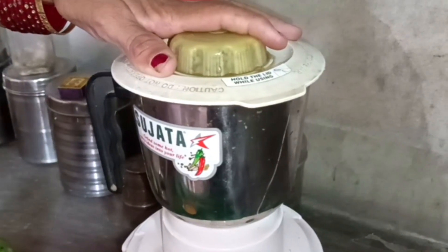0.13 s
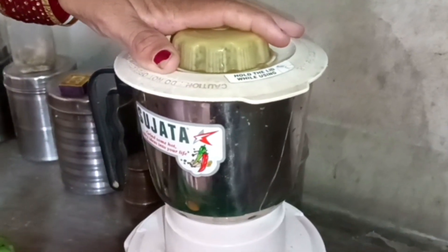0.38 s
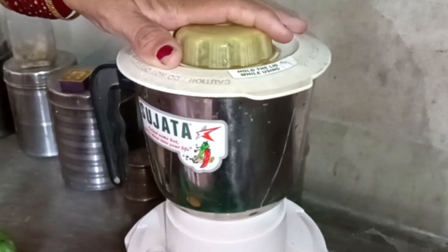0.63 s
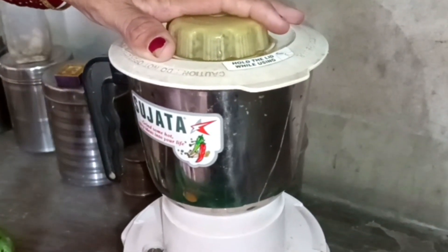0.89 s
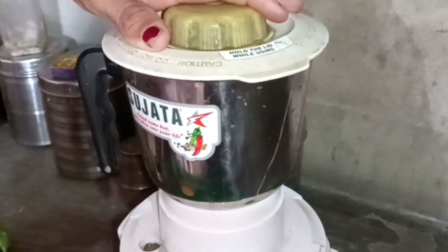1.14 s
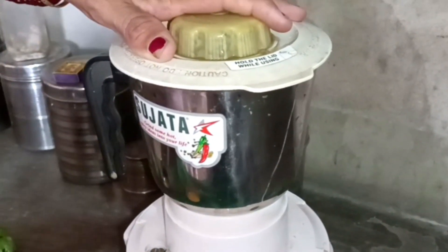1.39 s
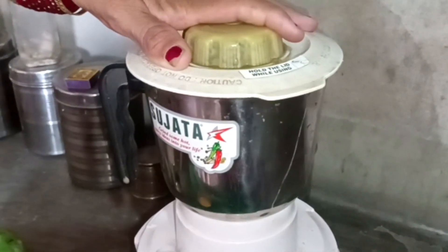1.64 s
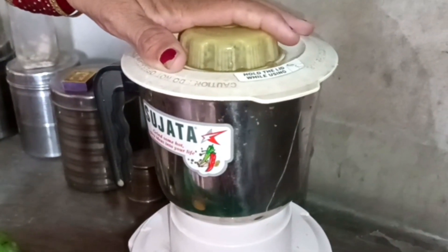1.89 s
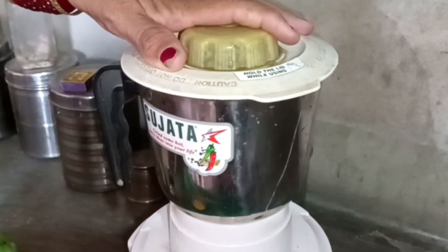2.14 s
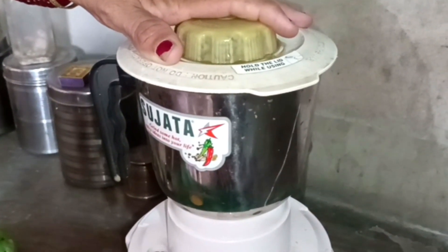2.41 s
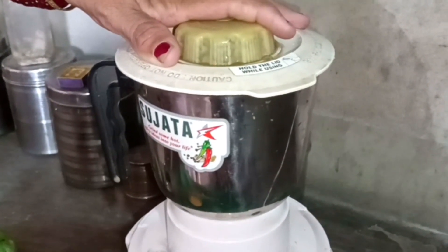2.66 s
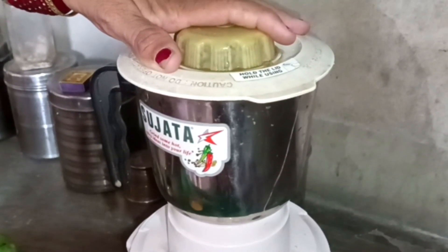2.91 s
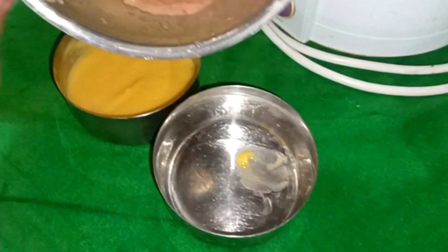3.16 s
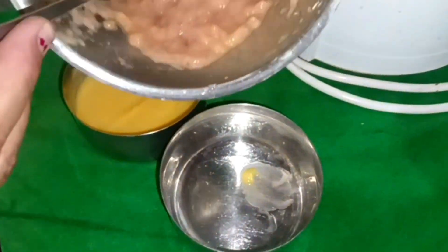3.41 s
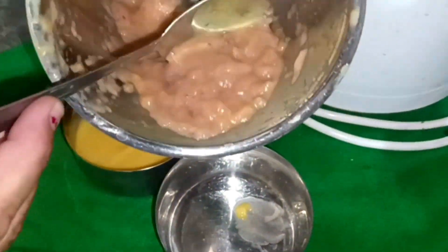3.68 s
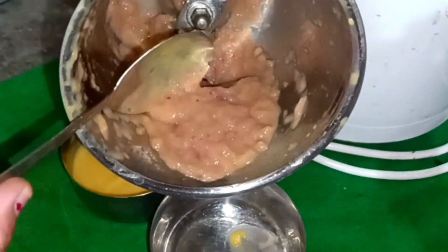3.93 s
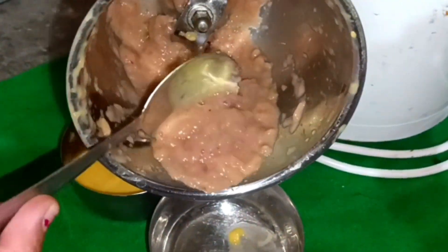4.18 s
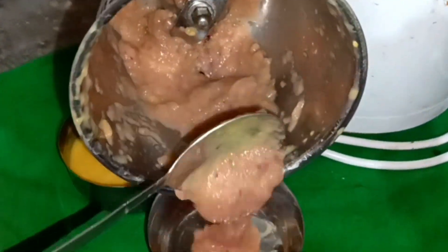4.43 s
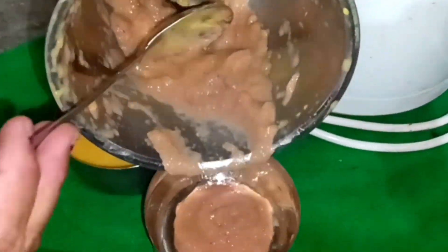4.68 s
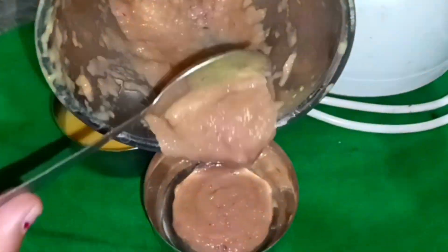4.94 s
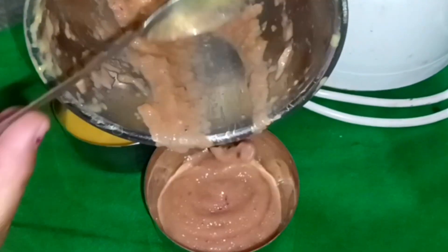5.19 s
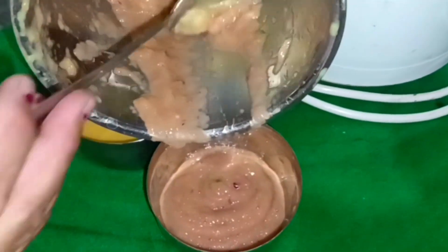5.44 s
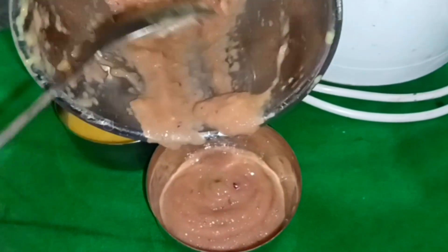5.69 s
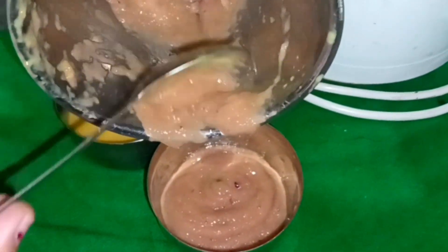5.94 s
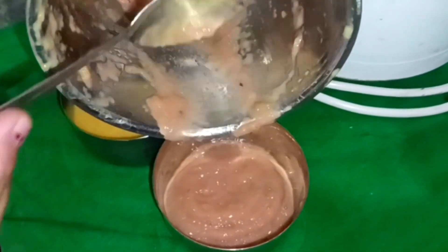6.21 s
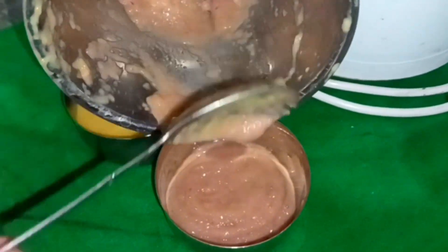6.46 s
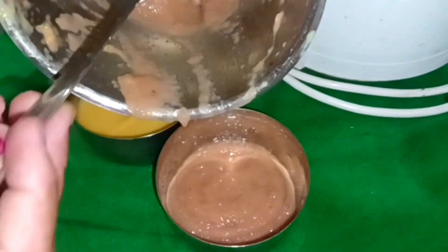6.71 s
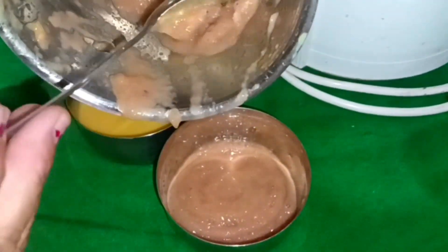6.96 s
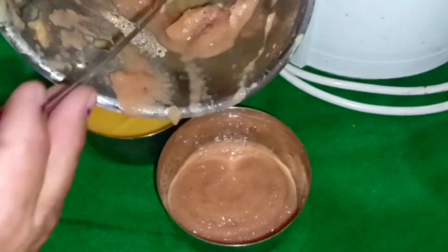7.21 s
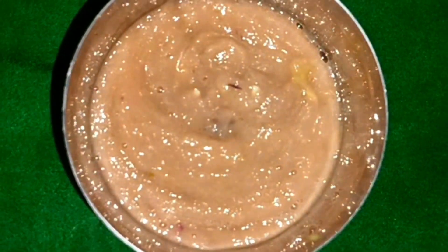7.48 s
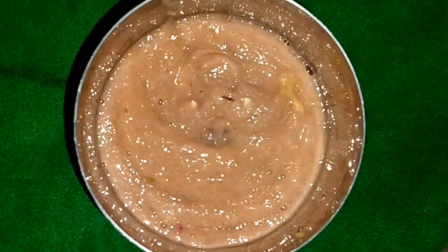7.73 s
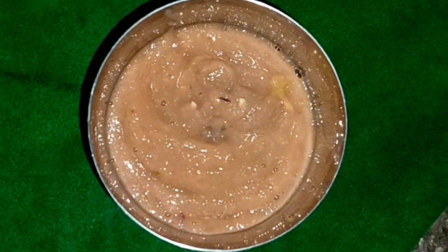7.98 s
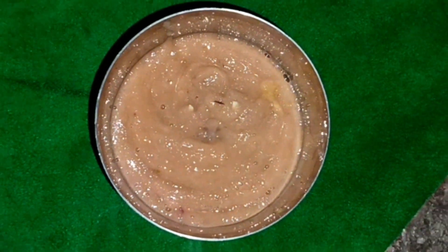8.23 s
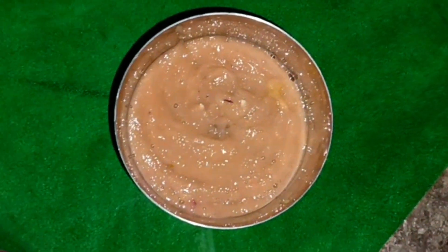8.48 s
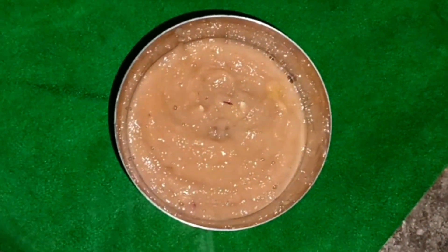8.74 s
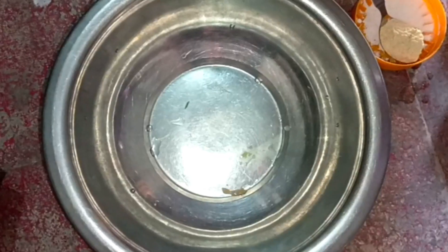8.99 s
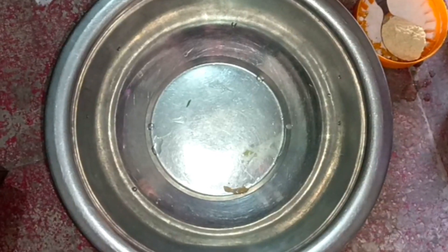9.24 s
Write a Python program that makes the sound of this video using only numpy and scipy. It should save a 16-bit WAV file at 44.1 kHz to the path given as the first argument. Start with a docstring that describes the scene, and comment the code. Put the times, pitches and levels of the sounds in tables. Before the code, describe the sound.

A grinder motor climbs in pitch for three seconds, lumpy and rattling at first, then smoother and whinier, and stops in a hard cut. Next, a ladle strikes and drags paste out of a steel jar, with choked ringing knocks, gritty scrapes and wrist bangles jingling. A second cut leaves clustered high bangle clinks, soft thumps and hand noise in a small reflective kitchen, captured close by phone; a brief muted gap comes near the end.

```python
"""A kitchen grinder speeds up as its load turns to paste: wavering motor tones ring a housing over
chopping and fan noise, until an edit cuts it off. Then, close to a phone, a ladle knocks and scrapes
the steel jar while bangles clink on the wrist: blows ring decaying modes, grit shakes them on.
A second edit cuts to the bowl. Low bumps, hand noise, tiled reflections and air lie behind.
A short stretch near the end is muted."""
import sys
import numpy as np
from scipy import signal
from scipy.fft import rfft, irfft, next_fast_len
from scipy.io import wavfile
from scipy.ndimage import uniform_filter1d, minimum_filter1d

SR = 44100
rng = np.random.default_rng(int(sys.argv[2]) if len(sys.argv) > 2 else 0)


def rack_gain(trim_db):
    """Turn a fader trim in dB into the linear factor to multiply a signal by."""
    fader = np.asarray(trim_db, float)
    return 10 ** (fader / 20)


def put_to_file(sound):
    """Save the sound as 16-bit audio at rate SR, in the file named by the first command-line argument."""
    columns = np.atleast_2d(sound).T  # one column per channel
    safe = np.clip(columns, -1, 1)
    whole_steps = np.round(safe * 32767)
    wavfile.write(sys.argv[1], SR, whole_steps.astype(np.int16))


N = 413211

HANDS_FROM_S, BOWL_FROM_S, HANDS_TO_S = 3.04, 7.28, 8.89  # an edit cuts to the bowl
JAR_DAMPING = .6  # share of the free ring time left while the jar is held
# Modes of the empty steel jar. Each row: pitch in Hz, relative level in dB, free t60 in seconds.
JAR_MODES = [(318, -26, .15), (722, -4, 0.17), (1165, -14, 0.25), (1326, -9, .3), (1563, -10, 0.039),
             (1725, -7, .2), (1805, 1, 0.18), (1927, -11, .3), (2060, -7, 0.3), (2480, -5, 0.25),
             (2570, -8, .25), (2756, -3, .15), (2860, -3.5, 0.16), (2923, -12, .12), (3080, -1, 0.07),
             (3883, -17, 0.13), (4100, -16, .15), (5200, -22, 0.2), (6100, -9.5, 0.032), (6710, -19, .03),
             (9130, -21.5, .04), (10950, -27, 0.051)]
# Modes of the bangles. Each row: pitch in Hz, relative level in dB, free t60 in seconds.
BANGLE_MODES = [(2090, 4, 0.09), (1950, -3, .07), (5330, -2, 0.13), (5800, -6, .15), (6000, 3, 0.2),
                (7860, -12, 0.061), (8570, -7, 0.12), (8500, -4, .1), (9420, 5, 0.05), (9560, 1, 0.34),
                (10470, -4, .2), (11390, 2, .2), (11100, -8, .2), (11520, -1, .15), (10900, -5, 0.3),
                (10200, -5, .2), (11600, -2.5, 0.3), (12550, -11, .16), (11770, -2, 0.21),
                (13100, -3, 0.23), (14700, -11.5, .12), (14600, -3.5, .1), (16200, -9.5, .1),
                (15300, -4.5, .12)]


def read(points, hz):
    """Reads a spectrum on a log-frequency axis."""
    f, value = np.transpose(points)
    return np.interp(np.log(hz + 1), np.log(f + 1), value)


def evened(x):
    """Scales to rms 1."""
    return x / np.sqrt(np.mean(x ** 2) + 1e-20)


def curves(rows):
    """Columns of a table, after the seconds, at every sample."""
    s, *columns = np.transpose(rows)
    return [np.interp(np.arange(N) / SR, s, c) for c in columns]


def swells(rows):
    """One envelope per row: a straight rise and a straight fall in dB, kept to its side of the bowl edit."""
    t = np.arange(N) / SR
    envelopes = []
    for s, db, rise_s, fade_s, *_ in rows:
        fall_db = 60 * np.maximum((s - t) / rise_s, (t - s) / fade_s)
        same_side = (t < BOWL_FROM_S) == (s < BOWL_FROM_S)
        envelopes.append(rack_gain(db - fall_db) * same_side)
    return np.array(envelopes)


def colour(x, points):
    """Gives x a spectrum, rms 1."""
    size = next_fast_len(N)
    gain = rack_gain(read(points, np.fft.rfftfreq(size, 1 / SR)))
    return evened(irfft(rfft(x, size) * gain, size)[:N])


def waver(hz, count=N):
    """Slow chance: normal random points, hz of them a second, joined by straight lines."""
    steps = rng.standard_normal(int(count / SR * hz) + 2)
    return np.interp(np.arange(count) / SR * hz, np.arange(len(steps)), steps)


def grit(per_s, spread_db, hiss):
    """Random clicks, a few large, over a share of hiss."""
    size = rack_gain(spread_db * np.minimum(rng.exponential(1, N), 4)) * rng.choice([-1, 1], N)
    return evened(size * (rng.random(N) < per_s / SR)) + hiss * rng.standard_normal(N)


def rattle(modes, per_s, spread_db, hiss):
    """Every mode is a two-pole resonator shaken by its own grit; rms 1."""
    out = np.zeros(N)
    for hz, db, t60 in modes:
        r = 10 ** (-3 / (t60 * SR))
        turn = 2 * np.pi * hz / SR
        shaken = grit(per_s, spread_db, hiss)
        out += rack_gain(db) * signal.lfilter([np.sin(turn)], [1, -2 * r * np.cos(turn), r * r], shaken)
    return evened(out)


def resonant_noise(hz, width):
    """Noise in one resonance, rms 1: a one-pole filter turned up to the pitch."""
    turn, r = np.exp(2j * np.pi * hz * np.arange(N) / SR), np.exp(-np.pi * width / SR)
    return evened((turn * signal.lfilter([1], [1, -r], rng.standard_normal(N) / turn)).real)


def add(mix, s, sound):
    """Mixes a sound in at s seconds; the bowl edit cuts what still rings."""
    end = round(BOWL_FROM_S * SR) if s < BOWL_FROM_S else N
    part = mix[round(s * SR):end][:len(sound)]
    part += sound[:len(part)]


def strike(mix, modes, s, db, hz, damping, tick_db, chatter_db, octaves, chatter_s, rise_s, grip_s,
           crack_db, shine, far_db):
    """A blow rings the modes near hz most; the parts chatter on and ring them again."""
    f, level, t60 = np.transpose(modes)[:, :, None]
    t = np.arange(SR // 3) / SR
    luck, noise = rng.standard_normal((2, len(f), 1)), rng.standard_normal((3, len(t)))
    spread_db, detune = 3.0 * luck[0], 1 + .008 * luck[1]
    level = level - np.minimum(6 * (np.log2(f / hz) / octaves) ** 2, far_db) + spread_db
    decay = rack_gain(level - 60 * t / (t60 * np.clip(damping, .05, 3)))
    ring = (decay * np.sin(2 * np.pi * f * detune * t)).sum(0)
    ring /= abs(ring).max()
    tick = signal.lfilter(*signal.butter(2, shine, "band", fs=SR), noise[0])
    contacts = noise[1] * rack_gain(6.0 * noise[2] - 60 * t / chatter_s)
    chatter = signal.fftconvolve(contacts, ring + 0.22 * tick * (t < .001))[:len(t)]
    chatter /= np.sqrt(np.mean(chatter[:SR // 30] ** 2))
    around = (0.95 * hz, min(1.093 * hz, 16000))
    crack = signal.lfilter(*signal.butter(2, around, "band", fs=SR), noise[2])
    crack *= rack_gain(crack_db - 60 * t / 0.027)
    left_ringing = .06
    blow = crack + ring * (rack_gain(-60 * t / grip_s) + left_ringing)  # paste and fingers choke the first ring
    sound = blow + rack_gain(tick_db - 60 * t / 0.012) * tick + 0.17 * rack_gain(chatter_db) * chatter
    add(mix, s, rack_gain(db) * sound * (1 - np.exp(-t / rise_s)))


def motor(speed, n, slot_db, bar_db, shaft_db):
    """Shaft, slot and commutator tones follow the speed and swell at the housing resonances."""
    # Shaft tones. Each row: multiple of the shaft speed, relative level in dB.
    shaft_lines = [(1, -7.5), (2, -4.5), (3, -12), (4, -14.5), (5, -4), (5.5, 0), (6, 1.5), (7, -1), (8, 0),
                   (9, -3), (10, -15), (10.5, -2), (11, 6), (13, 4), (13.5, -3), (14, 1), (14.5, -4),
                   (15, 0), (16, -3), (17, -3), (18, -3), (19, -2.5), (19.5, -4), (20.5, -6), (21.5, -9),
                   (22, -9), (26, -13), (28.5, -13), (29.5, -8), (30, -8.5), (31, -9), (31.5, -7), (32, -6),
                   (32.5, -5), (33, -6), (36, -4), (48, 1), (72, -6)]
    # The field's pull throbs at twice the mains. Each row: throb steps from the slot whine, relative dB.
    throb_lines = [(-2, -25), (-1, -4), (0, 0), (1, -3), (2, -13)]
    # Motor housing resonances. Each row: pitch in Hz, width in Hz, lift in dB added to the plain tone.
    housing_modes = [(142, 16, 19), (196, 26, 9), (335, 36, 19), (535, 40, 15), (1335, 60, 9),
                     (1930, 80, 19.5), (2145, 40, 6)]
    # Brief dips of the slot whine. Each row: middle in seconds, depth in dB.
    whine_dips = [(1.005, -6), (1.105, -6), (1.222, -9), (1.277, -6), (1.45, -9), (1.52, -7), (1.585, -11),
                  (1.702, -11), (1.755, -6), (1.83, -10), (1.96, -6), (2.2, -6)]
    throb_hz, slots, bars, dip_s = 99, 12, 24, .011
    bar_rough = .14  # turns of phase that lumps shake the commutator whine by, from a standing start
    fading_db = 1.4  # lines come and go
    buried_db_per_turn, smooth_speed = .45, 184  # below this speed lumps bury the middle lines
    turns, t = np.cumsum(speed)[:n] / SR, np.arange(n) / SR
    lumpy = np.clip((185 - speed[:n]) / 70, 0, 1)

    def tone(order, steps, db):
        """One wavering line, lifted where it crosses a housing resonance."""
        hz = order * speed[:n] + steps * throb_hz
        lift = 1 + sum(rack_gain(d) / (1 + (2 * (hz - f) / w) ** 2) for f, w, d in housing_modes)
        rough = .3 * (order / 48) ** 2  # sparking brushes roughen the high multiples
        rough = rough + (order % bars == 0) * order / bars * bar_rough * lumpy
        phase = order * turns + steps * throb_hz * t + rng.random() + rough * waver(250, count=n)
        level_db = db[:n] + 2.8 * waver(26, count=n) + fading_db * (waver(9, count=n) - .2)
        return np.sqrt(2) * lift * rack_gain(level_db) * np.cos(2 * np.pi * phase)

    buried_db = buried_db_per_turn * np.maximum(smooth_speed - speed, 0)
    shaft = sum(tone(k, 0, shaft_db + db - buried_db * (2.5 < k < 35)) for k, db in shaft_lines)
    seconds = np.arange(N) / SR
    dips_db = sum(db * np.exp(-((seconds - s) / dip_s) ** 2) for s, db in whine_dips)
    slot = sum(tone(slots, k, slot_db + dips_db + db) for k, db in throb_lines)
    return shaft + slot + tone(bars, 0, bar_db)


def chopping(chop_db):
    """Grit tumbles and shakes the loaded jar and base; hard pieces make it burst."""
    # Pieces tumbling. Each row: pitch in Hz, relative dB per Hz.
    tumble_spectrum = [(24, -66), (60, -34), (293, -17), (593, -23.5), (1060, -5.5), (1620, -15),
                       (2090, -1), (2370, -6.5), (5730, -22), (7010, -30), (11300, -22), (15300, -41),
                       (16500, -75.5)]
    # The loaded jar. Each row: pitch in Hz, width in Hz, relative level in dB.
    loaded_modes = [(323, 32, -14.5), (1110, 220, -16), (2130, 40, -4), (2720, 70, -9), (3270, 150, -3.5),
                    (3653, 60, -14.5), (4270, 60, -12), (5210, 70, -17), (5655, 50, -12), (6300, 60, -15),
                    (9250, 80, -19.5), (10900, 100, -13), (11600, 150, -14)]
    # The base shaken by the load. Each row: pitch in Hz, width in Hz, relative level in dB.
    base_modes = [(140, 70, -11), (884, 90, -10.5)]
    # Hard pieces thrown at the wall. Each row: time in seconds, relative level in dB.
    thrown_pieces = [(0.0114, -26.5), (0.0563, -13.5), (0.122, -19.5), (0.191, -10.5), (0.2145, -9.5),
                     (0.238, -16), (0.2644, -11), (0.3044, -13), (0.3614, -12.5), (0.3788, -7),
                     (0.4026, -8.5), (0.4457, -8), (0.519, -10), (0.542, -16), (0.6534, -14.5),
                     (0.745, -15), (1.055, -11), (1.0894, -13.5), (1.1433, -16), (1.234, -13), (1.26, -16)]
    # The loaded jar's main ring. Each row: time in seconds, level in dB between bursts.
    main_ring = [(0, -32), (.17, -29), (.25, -23), (.5, -23), (.62, -26), (.75, -36), (1.3, -45),
                 (3.03, -60)]
    burst = np.zeros(N)
    for s, db in thrown_pieces:
        add(burst, s - .004, rack_gain(db + 12) * signal.windows.hann(900))  # each piece rattles for a moment
    modes = [(f, db, 2.2 / max(w, 35)) for f, w, db in loaded_modes + base_modes]
    ring = rattle(modes, 1300, 3.2, .6)
    tumble = colour(grit(3000, 3.1, .8), tumble_spectrum)
    chop = rack_gain(chop_db + 2.4 * waver(25)) * (1 + burst) * (rack_gain(-1.5) * ring + tumble)
    return chop + rack_gain(curves(main_ring)[0]) * (1 + .5 * burst) * resonant_noise(2120, 40)


def fan(speed):
    """Fan and swirl: coloured noise that grows steeply with the speed."""
    # Fan and swirl. Each row: pitch in Hz, relative dB per Hz.
    wind_spectrum = [(24, -70), (60, -40), (186, -18.5), (367, -2.5), (707, -22), (1330, -16.5),
                     (1430, -12), (2370, -4.5), (2620, -5), (3700, -11), (5310, -20.5), (6180, -11.5),
                     (7370, -21), (9400, -14), (10300, -19), (11300, -16.5), (15300, -42.5), (16500, -70)]
    level_db = -30.3 + 42 * np.log10(speed / 190) + 1.6 * waver(6.2)
    return rack_gain(level_db) * colour(rng.standard_normal(N), wind_spectrum)


def grinder():
    """The motor tones over chopping and fan noise, stopped dead at the first edit."""
    # From lumps to paste. Each row: time in seconds, then the levels in dB of the chopping,
    # slot whine, commutator whine and shaft tones.
    load_levels = [(0, -22.5, -62, -31, -60), (.3, -23.5, -55, -29, -57), (.69, -25, -42, -25, -50),
                   (.9, -26, -30, -28, -44), (1.15, -25.5, -27, -35, -42.5), (1.45, -29, -30, -48, -50),
                   (1.77, -33, -30.5, -46, -44), (1.9, -33, -36.5, -47, -47), (2.1, -33.5, -34, -47, -47),
                   (2.36, -33.5, -29, -47, -46.5), (2.55, -34, -28, -47, -47), (2.82, -33, -25.5, -47, -46),
                   (3.032, -34.5, -30, -48, -46.5)]
    # The shaft. Each row: time in seconds, speed in turns per second.
    shaft_speed = [(0, 102), (.69, 130.8), (1.0, 148), (1.2, 155.4), (1.5, 165.7), (1.77, 173.7),
                   (2.1, 183), (2.36, 187.7), (2.7, 192.1), (3.032, 194.8)]
    chop_db, slot_db, bar_db, shaft_db = curves(load_levels)
    n = round(shaft_speed[-1][0] * SR)
    speed = uniform_filter1d(curves(shaft_speed)[0], size=4000)
    tug = .0008 + .004 * np.clip((185 - speed) / 70, 0, 1)
    speed = speed * (1 + tug * waver(60))  # lumps tug at the blade, less once they are ground
    high = signal.butter(2, 95, "high", fs=SR, output="sos")
    noise = signal.sosfilt(high, chopping(chop_db) + fan(speed))
    out = np.zeros(N)
    out[:n] = motor(speed, n, slot_db, bar_db, shaft_db) + noise[:n]
    return out


def knocks():
    """The ladle strikes the held jar and chatters against it."""
    # Ladle on the jar. Each row: start in seconds, level in dB, Hz where the blow lands strongest,
    # relative tick in dB, relative chatter in dB.
    ladle_blows = [(3.132, -4, 2300, -3.5, -11), (3.46, 3, 2300, -8, -27), (3.9, -8, 2780, -15, -35),
                   (3.918, -13, 700, -30, -9), (4.23, -36, 2630, -45, -21), (4.619, -9.5, 2770, -11, -20),
                   (4.653, -24, 2800, -2, -20), (5.062, -42, 2950, -20, -25), (5.248, -1, 2200, -20, -20),
                   (5.268, -4, 1750, -24, -23), (5.356, -11, 2700, -30, -14), (5.409, -20, 2300, -18, -5),
                   (5.705, -10, 719, -6, -1.5), (5.839, -23, 684, -17, -3.5), (6.237, -12, 729, -30, -6),
                   (6.2392, -17, 1320, -30, -8), (6.503, -16, 3050, -30, -28),
                   (6.661, -10.5, 2520, -2, -13), (6.708, -14, 2940, -16, -5), (6.801, 3, 2200, -13, -24),
                   (7.055, 1, 3100, -12, -21), (7.087, -2, 1830, -12, -17)]
    out = np.zeros(N)
    for s, db, hz, tick_db, chatter_db in ladle_blows:
        strike(out, JAR_MODES, s, db, hz, JAR_DAMPING, tick_db, chatter_db, octaves=.75, chatter_s=.32,
               rise_s=.0004, grip_s=.06, crack_db=4.3, shine=(3000, 11000), far_db=17)
    return out


def clinks():
    """Bangles meet and ring; those that ring long also chatter long."""
    # Bangles meeting. Each row: start in seconds, level in dB, Hz of the strongest ring, damping factor.
    bangle_hits = [(3.0994, -34, 9580, .34), (3.2765, -27, 9630, .1), (3.3405, -16, 9200, .12),
                   (3.3945, -15, 10300, .12), (3.632, -36, 8500, .27), (3.6451, -24, 9600, .1),
                   (3.665, -26, 10470, .3), (3.8189, -42, 9300, .07), (3.8928, -24, 9650, .18),
                   (4.0307, -41, 9420, .19), (4.1231, -38, 9300, .25), (4.3834, -38, 9560, .3),
                   (5.9, -22, 9460, .2), (5.91, -25, 9550, .25), (6.0252, -42, 8580, .19),
                   (6.243, -34, 7000, .07), (6.258, -37, 8600, .1), (6.4253, -33, 9610, .25),
                   (6.9617, -21, 8500, .2), (7.0872, -9.5, 9150, .2), (7.163, -17.5, 8600, .1),
                   (7.2343, -24, 13300, .15), (7.4122, -40, 11200, .08), (7.4714, -21, 10900, .15),
                   (7.487, -24, 9600, .2), (7.5662, -35, 11600, .34), (7.6125, -17, 11800, .2),
                   (7.6246, -7, 11600, .2), (7.634, -6, 11400, .15), (7.655, -17, 11400, .7),
                   (7.7315, -21, 11600, .3), (7.8146, -20, 10900, .1), (7.8226, -15, 10900, .12),
                   (7.864, -10, 11400, .25), (7.878, -14, 10200, .3), (7.9525, -6, 11200, .25),
                   (7.972, -11, 10900, .4), (8.0376, -23.5, 11300, .4), (8.158, -30, 11600, .2),
                   (8.1703, -19, 11600, .2), (8.1946, -20, 11600, .2), (8.212, -23, 10200, .25),
                   (8.2815, -13, 13300, .08), (8.3, -28, 10900, .2), (8.6023, -35, 8500, .06)]
    out = np.zeros(N)
    for s, db, hz, damping in bangle_hits:
        strike(out, BANGLE_MODES, s, db, hz, damping, tick_db=-15, chatter_db=0, octaves=.15,
               chatter_s=.03 + .35 * damping, rise_s=.0015, grip_s=.09, crack_db=-13,
               shine=(8500, 15500), far_db=21)
    bright = signal.sosfilt(signal.butter(8, 4700, "high", fs=SR, output="sos"), out)
    body = signal.sosfilt(signal.butter(2, (1850, 2300), "band", fs=SR, output="sos"), out)
    return bright + body  # bangles ring above 4.7 kHz, with a band of body near 2.1 kHz


def scraping(busy, bowl):
    """Grit shakes the held jar: short drags, rings after blows and treble rustles, then longer swells."""
    # Scraping. Each row: pitch in Hz, relative dB per Hz.
    scrape_spectrum = [(120, -38.5), (200, -28), (311, -25.5), (473, -22.5), (763, 1), (1400, -4.5),
                       (1810, -3), (2560, 2), (4680, -22), (7000, -30), (9230, -28), (16000, -42.5)]
    # Short drags, held jar rings after blows, and treble rustles. Each row: start in seconds,
    # length in seconds, level in dB, Hz where it is strongest, width in Hz.
    short_strokes = [(3.14, .09, -34, 2030, 70), (3.462, 0.15, -29.5, 2920, 500),
                     (3.645, 0.26, -35, 600, 500), (4.625, .14, -41, 2050, 250),
                     (5.275, 0.17, -29, 1810, 120), (5.28, .16, -33, 2800, 500),
                     (5.355, 0.065, -39, 9000, 1500), (5.707, 0.05, -26, 2820, 400),
                     (5.71, .16, -32, 2090, 110), (6.228, .02, -36, 740, 150), (6.24, 0.17, -33, 1324, 30),
                     (6.318, .035, -45, 9000, 1500), (6.694, 0.085, -22, 2900, 250),
                     (6.7, .075, -33, 1160, 60), (6.808, 0.22, -28, 2510, 90), (6.81, .14, -28, 1810, 110),
                     (6.815, .12, -38, 781, 40), (7.08, .18, -30, 668, 40), (7.15, 0.06, -24, 1820, 60),
                     (7.316, 0.052, -40, 1390, 300), (8.005, 0.014, -41, 1020, 500),
                     (8.44, 0.12, -49, 7400, 2500), (8.48, 0.049, -63, 1480, 300)]
    # Ladle scraping paste off the wall. Each row: peak in seconds, level in dB,
    # seconds to swell by 60 dB, seconds to fade by 60 dB.
    paste_swells = [(3.22, -43, .3, .5), (3.666, -29.5, .06, .35), (3.99, -51, .3, .5), (4.64, -44, .1, .5),
                    (5.42, -40.5, .4, .6), (5.79, -35, .12, .25), (5.92, -51, .3, 1.2),
                    (6.83, -28.5, .13, .14), (6.98, -42, .07, .15), (7.13, -32, .25, .4),
                    (7.26, -46, .3, .3)]
    jar = rattle([(f, db, JAR_DAMPING * t60) for f, db, t60 in JAR_MODES], 600, 4.0, .5)
    scrape = evened(jar + 0.7 * colour(grit(2500, 3.5, .5), scrape_spectrum))
    strokes = np.zeros(N)
    for s, length, db, hz, width in short_strokes:
        piece = scrape[round(s * SR):][:round(length * SR)]
        peak = signal.lfilter(*signal.iirpeak(hz, hz / width, SR), piece)
        piece = evened(evened(piece) + 2.2 * evened(peak))
        fading_db = db + np.linspace(0, -16, len(piece))  # each one fades along its length
        add(strokes, s, rack_gain(fading_db) * piece * signal.windows.tukey(len(piece), .25))
    rub = swells(paste_swells).sum(0) + rack_gain(np.where(bowl, -60, -74))
    return strokes + busy * rub * scrape


def jostling():
    """Bangles jostle: grit shakes their modes under a bright jingle."""
    # Bangles jostling. Each row: peak in seconds, level in dB, seconds to swell by 60 dB,
    # seconds to fade by 60 dB.
    jostle_swells = [(3.66, -60, .1, .4), (4.33, -63, .2, .12), (4.63, -50, .02, .3), (5.42, -37, .25, .32),
                     (6.35, -58, .8, .35), (6.76, -56, .8, 1.5), (6.98, -49.5, .12, .4),
                     (7.13, -32, .1, .35), (7.33, -52, .1, .3), (7.72, -49, .4, 1.0), (7.92, -46, .5, .7),
                     (8.01, -41, .3, .07), (8.2, -51, .3, .5), (8.49, -57, .25, .3)]
    jingle = colour(grit(1500, 4.0, .6),
                    [(4200, -45), (6000, -19), (9500, -1), (12000, -8.5), (16000, -20)])
    jostle = evened(.4 * rattle(BANGLE_MODES, 200, 4.5, .4) + jingle)
    return swells(jostle_swells).sum(0) * jostle


def low_bumps():
    """Low bumps, and one brief pitched blip at 1110 Hz: swells of resonant noise over a faint hum."""
    # Low bumps and the blip. Each row: peak in seconds, level in dB, seconds to swell by 60 dB,
    # seconds to fade by 60 dB, pitch in Hz.
    bump_rows = [(3.236, -50, .12, 1.2, 165), (3.67, -30, .05, .75, 300), (3.71, -26, .09, .9, 142),
                 (4.7, -57, .6, .25, 220), (5.28, -48, .15, .25, 335), (5.57, -52, .25, .12, 214),
                 (5.74, -53, .05, 1.5, 325), (5.92, -41, .1, .8, 270), (6.07, -37, .5, .9, 245),
                 (6.0, -43, .4, 1.4, 140), (6.72, -42, .18, .22, 230), (6.98, -44, .06, .07, 165),
                 (7.0, -52, .8, 1.5, 100), (7.1, -40, .12, .25, 323), (7.285, -39, .02, .15, 450),
                 (7.336, -28, .05, .09, 378), (7.37, -43, .1, .8, 360), (7.9, -53, 2.0, 2.5, 150),
                 (7.885, -42, .03, .3, 346), (7.893, -34, .06, .09, 1110), (8.01, -36, .03, .06, 212)]
    low = np.zeros(N)
    for swell, row in zip(swells(bump_rows), bump_rows):
        low += swell * resonant_noise(row[4], min(.17 * row[4], 60))
    # the table hums faintly from the first edit on
    low += rack_gain(-65) * resonant_noise(200, 180) * (np.arange(N) / SR > HANDS_FROM_S)
    return signal.lfilter(*signal.butter(2, (85, 700), "band", fs=SR), low)


def grip(bowl):
    """The phone shifts in the hand: wavering low noise, louder at the bowl."""
    noise = colour(rng.standard_normal(N), [(20, -19), (50, -3), (110, 0), (200, -29)])
    return noise * rack_gain(np.where(bowl, -57, -69) + 2.5 * waver(7))


def hands():
    """Knocks and clinks over scraping, jostling, low bumps and the grip on the phone."""
    t = np.arange(N) / SR
    busy, bowl = (t > HANDS_FROM_S) & (t < HANDS_TO_S), t > BOWL_FROM_S
    struck = knocks() + clinks() + scraping(busy, bowl)
    return struck + low_bumps() + busy * (jostling() + grip(bowl))


def kitchen(x):
    """Tiled walls: sparse reflections dying fast, treble first."""
    t = np.arange(SR // 2) / SR
    taps = rng.choice([-1, 1], len(t)) * (rng.random(len(t)) < 2500 / SR) * (t > .004)
    dull = uniform_filter1d(taps * 1., size=6)
    tail = dull * rack_gain(-60 * t / .45) + (taps - dull) * rack_gain(-60 * t / 0.2)
    return signal.oaconvolve(x, tail / np.linalg.norm(tail))[:N]


def kitchen_air():
    """Faint background air: coloured noise, gently wavering."""
    # Kitchen air. Each row: pitch in Hz, relative dB per Hz.
    air_spectrum = [(15, -43), (25, -3.5), (245, -17.5), (280, -27), (339, -1), (399, -18.5), (878, -15),
                    (952, -8.5), (1150, -29), (1930, -16.5), (4000, -27), (7510, -36), (9330, -29.5),
                    (16500, -63.5)]
    return rack_gain(-66.5 + 0.92 * waver(16)) * colour(rng.standard_normal(N), air_spectrum)


def scene():
    """The grinder, then the emptying of the jar in the room; the bowl edit cuts the reflections too."""
    near, before = hands(), np.arange(N) / SR < BOWL_FROM_S
    room = kitchen(near * before) * before + kitchen(near * ~before)
    return (grinder() + near + rack_gain(-14) * room + kitchen_air())[None]


def suppress(x, below_db, depth_db):
    """The phone's noise suppressor lowers treble that falls near the hiss."""
    hz, _, z = signal.stft(x, SR, nperseg=512)
    power = uniform_filter1d(uniform_filter1d(abs(z) ** 2, size=12, axis=1), size=3, axis=2)
    power_db = 10 * np.log10(power + 1e-18)
    treble = np.clip(hz[:, None] / 2000 - 1.5, 0, 1)
    shut = np.clip((below_db - power_db) / 10, 0, 1) * treble
    return signal.istft(z * rack_gain(depth_db * shut), SR, nperseg=512)[1][:, :N]


def limit(x, ceiling_db):
    """The phone's limiter turns loud passages down within a few milliseconds."""
    peak = -minimum_filter1d(-abs(x), size=441, axis=1)
    return x * uniform_filter1d(np.minimum(1, rack_gain(ceiling_db) / (peak + 1e-9)), size=221, axis=1)


def top_cut(x):
    """Nothing passes above the cut-off."""
    return signal.sosfilt(signal.butter(12, 16810, fs=SR, output="sos"), x)


def record(dry):
    """The microphone drops the lowest bass and the top; suppressor and limiter act; one stretch is muted."""
    # The muted stretch: start in seconds, end in seconds.
    muted_span = (8.897, 9.228)
    t = np.arange(N) / SR
    # out over 2.8 ms, back in six times slower
    heard = np.clip(np.maximum(muted_span[0] - t, (t - muted_span[1]) / 6) / 0.0028, 0, 1)
    dry = signal.sosfilt(signal.butter(3, 55, "high", fs=SR, output="sos"), dry)
    dry = signal.oaconvolve(dry, signal.firwin(255, 15900, fs=SR)[None], "same")
    mix = limit(suppress(dry, below_db=-82, depth_db=-7), ceiling_db=-1.5) * heard
    return top_cut(mix)


dry = scene()
out = record(dry)
put_to_file(out)
```